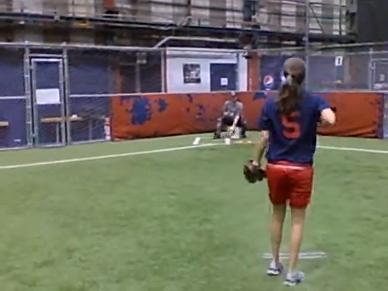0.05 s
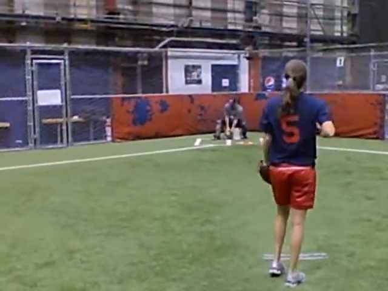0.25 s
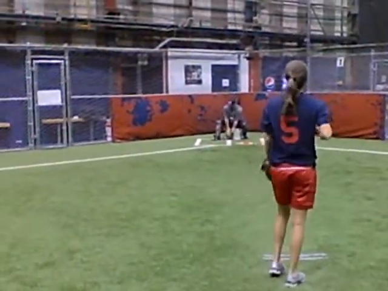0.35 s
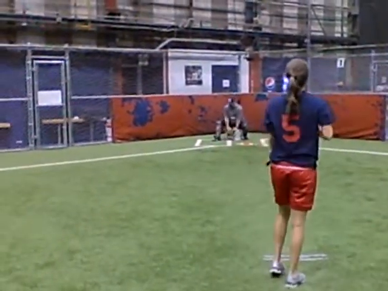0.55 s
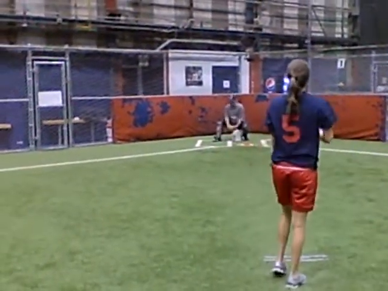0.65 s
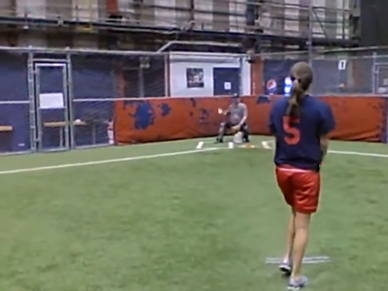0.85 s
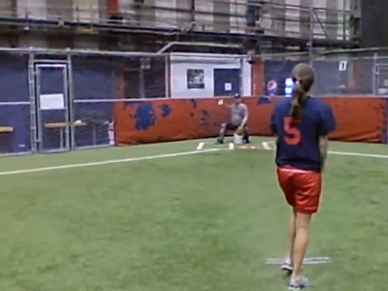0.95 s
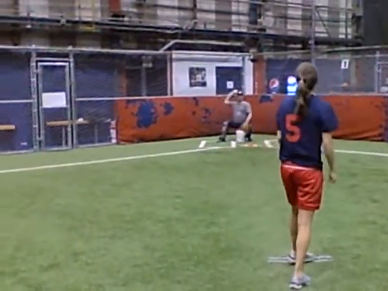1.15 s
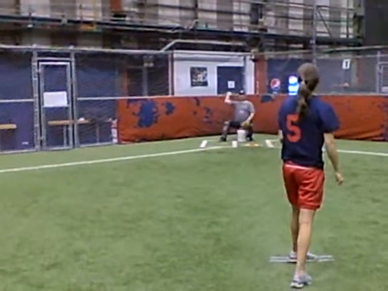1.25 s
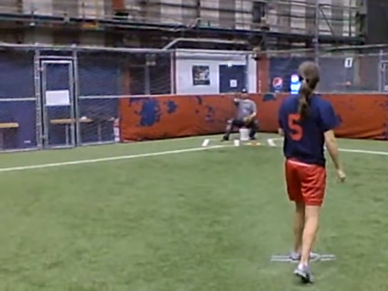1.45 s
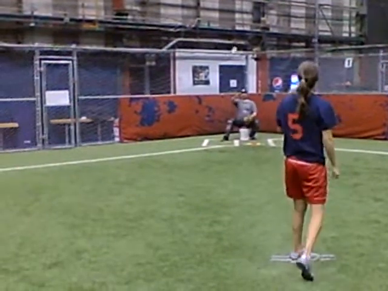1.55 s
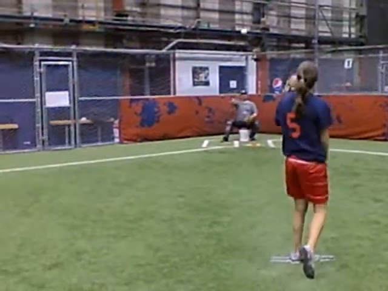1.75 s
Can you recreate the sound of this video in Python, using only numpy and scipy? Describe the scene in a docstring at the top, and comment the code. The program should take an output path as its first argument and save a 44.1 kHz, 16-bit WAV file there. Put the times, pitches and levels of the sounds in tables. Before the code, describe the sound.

A thrown ball smacks once into a leather glove. Quick echoes bounce off the walls of a large indoor practice hall and fade, leaving a faint, steady ventilation rumble.

```python
"""A catch in a practice hall

A thrown ball smacks into a leather glove: the impact excites low modes of the padded pocket and bright
ones of the leather. Near surfaces and far walls reflect the smack, then the large hall reverberates.
Ventilation rumbles throughout, with a few faint steady whines."""
import sys
import numpy as np
from scipy import signal
from scipy.fft import rfft, irfft
from scipy.io import wavfile

SR = 44100
rng = np.random.default_rng(int(sys.argv[2]) if len(sys.argv) > 2 else 0)


def log_audio(samples):
    """Write samples as a 16-bit WAV file to the path given in sys.argv[1]."""
    # one column per channel
    frames = np.atleast_2d(samples).T
    # limit to full scale, then quantise
    limited = np.clip(frames, -1, 1)
    pcm = np.round(limited * 32767).astype(np.int16)
    wavfile.write(sys.argv[1], SR, pcm)


N = 79380
T = np.arange(N) / SR
BIN_HZ = np.fft.rfftfreq(N, 1 / SR)
CATCH_S, CUTOFF_HZ = .2014, 7800


def from_db(db):
    """Amplitude ratio of a level in decibels."""
    return 10 ** (np.asarray(db) / 20)


def unit_rms(x):
    """Normalisation to an rms of 1."""
    return x / np.sqrt(np.mean(x ** 2) + 1e-20)


def at_hz(table, hz, column=1):
    """Interpolation of a table column on a log-frequency axis."""
    rows = np.array(table, float)
    return np.interp(np.log(np.maximum(hz, 1)), np.log(rows[:, 0]), rows[:, column])


def noise(spectrum):
    """Spectral shaping: white noise takes the given colour, at an rms of 1."""
    white = rfft(rng.standard_normal(N))
    return unit_rms(irfft(white * from_db(at_hz(spectrum, BIN_HZ)), N))


def decay(start, t60):
    """Exponential decay: 1 at the start, 60 dB down after t60 seconds."""
    return (T >= start) * np.exp(-np.log(1000) * np.maximum(T - start, 0) / t60)


def swell(start, rise_s):
    """Exponential approach from 0 towards 1."""
    return 1 - np.exp(-np.maximum(T - start, 0) / rise_s)


def ring(start, modes):
    """Modal superposition: damped sines set off together."""
    return sum(from_db(db) * decay(start, t60) * np.sin(2 * np.pi * hz * (T - start))
               for hz, db, t60 in modes)


def band(x, low_hz, high_hz, order=1):
    """Causal band-pass filtering."""
    sos = signal.butter(order, [low_hz, high_hz], "band", fs=SR, output="sos")
    return signal.sosfilt(sos, x + 1e-18)


def ventilation():
    """Broadband air noise, with whines that waver by random amplitude and phase modulation."""
    # rush of air: (frequency [Hz], relative spectral level [dB])
    air_spectrum = [(20, -3), (40, -3.5), (54, -0.5), (74, -10), (115, -4), (190, -9), (240, -1.5),
                    (300, -4), (450, -8.5), (780, -7), (1000, -12.5), (1300, -11), (1900, -24.5),
                    (3600, -26.5), (5400, -28.5), (6400, -27), (7200, -33.5)]
    # steady whines: (frequency [Hz], rms level [dB])
    whines = [(54, -75.5), (1200, -77), (2998, -93), (3601, -82.5), (3720, -87), (4081, -97.5),
              (6239, -92.5)]
    sound = from_db(-60.5) * noise(air_spectrum)
    slow = np.exp(-BIN_HZ / 32)  # the wavering lies mostly below 32 Hz
    for hz, db in whines:
        drift = irfft(rfft(rng.standard_normal((2, N))) * slow, N)
        waver, phase = 0.2 * unit_rms(drift)
        sound += from_db(db) * np.sqrt(2) * (1 + waver) * np.sin(2 * np.pi * hz * T + phase)
    return sound


def glove():
    """Impact excitation: pocket and leather ring in damped modes, and slaps add bursts of noise."""
    # modes of the padded pocket: (frequency [Hz], level [dB], t60 [s])
    pocket_modes = [(212.6, -22.5, 0.05), (288, -16, 0.023), (408.4, -25, 0.037), (692, -31, 0.035),
                    (932, -42, .1), (1372, -35, 0.069), (1490, -39.5, 0.08)]
    # modes of the leather: (frequency [Hz], level [dB], t60 [s])
    leather_modes = [(2023, -35, 0.024), (3110, -32, 0.019), (3340, -23.5, 0.0088), (4034, -25.5, 0.015),
                     (4940, -36, .016), (5086, -32.5, 0.013)]
    # leather slaps the ball as the glove shuts: (time [s], relative level [dB])
    slaps = [(0.2026, 2.5), (0.2021, 4), (0.2043, -4.5)]
    # crack of those slaps: (frequency [Hz], relative spectral level [dB])
    crack_spectrum = [(100, -10.5), (400, -11), (1200, -1), (1750, -12), (2600, 0.5), (4000, -8.5),
                      (5500, 2), (7000, -16.5)]
    pocket = ring(CATCH_S, pocket_modes) * swell(CATCH_S, rise_s=.0013)  # the ball sinks into padding
    thump = band(pocket, 124, CUTOFF_HZ, order=2)  # a glove is too small to radiate deep bass
    leather = ring(CATCH_S, leather_modes) * swell(CATCH_S, rise_s=.0011)
    bursts = sum(from_db(db) * decay(start, t60=.018) for start, db in slaps)
    crack = from_db(-44.5) * noise(crack_spectrum) * bursts
    return thump + leather + crack


def echoes(smack):
    """Specular reflection: each surface returns a delayed, weaker, band-limited copy of the smack."""
    # reflections: (arrival time [s], gain [dB], low edge [Hz], high edge [Hz])
    reflections = [(0.2104, -15, 500, 4500), (.2185, -13, 120, 1820), (0.2725, -24, 1200, 7060),
                   (0.2868, -26.5, 1280, 7470), (0.2959, -13.5, 890, 7560), (.3000, -23, 603, 6500),
                   (0.345, -22, 150, 4000), (.3715, -21.5, 1500, 7000)]
    sound = np.zeros(N)
    for arrival, db, low, high in reflections:
        delayed = np.interp(T - (arrival - CATCH_S), T, smack, left=0)
        sound += from_db(db) * band(delayed, low, high)
    return sound


def sprays():
    """Scattering: fences and roof trusses break the smack into short sprays of noise."""
    # scattered arrivals: (time [s], level [dB], t60 [s])
    arrivals = [(0.211, -43.5, 0.14), (0.2745, -52, 0.037), (0.2857, -44.5, 0.043), (0.2956, -43.5, 0.076),
                (0.346, -50.5, 0.086)]
    # scattered sound: (frequency [Hz], relative spectral level [dB])
    spray_spectrum = [(60, -18.5), (120, -8), (220, -5), (420, -4), (630, -3.5), (930, -2), (1100, -8.5),
                      (1350, 5), (1700, -17), (2200, -6), (2650, -18), (3400, -9), (4600, -19.5),
                      (6500, -20)]
    return noise(spray_spectrum) * sum(from_db(db) * decay(start, t60) for start, db, t60 in arrivals)


def hall():
    """Reverberation: a diffuse field builds up and decays band by band, the bass lasting longest."""
    # diffuse field: (frequency [Hz], relative spectral level [dB], t60 [s])
    field = [(60.5, -13, 2.3), (132, -3, 1.1), (258, 0, 1.57), (390, -1.5, 1.27), (740, 0, 1.26),
             (1330, -4.5, 1.06), (1720, -13.5, 1.34), (2770, -18.5, 1.38), (3600, -12, 0.76),
             (4450, -25, 1), (7000, -29, 1)]
    wash = rfft(noise(field))
    edges_hz = np.geomspace(40, 10240, 17)  # half-octave bands
    tail = np.zeros(N)
    for low, high in zip(edges_hz, edges_hz[1:]):
        band_noise = irfft(wash * ((BIN_HZ >= low) & (BIN_HZ < high)), N)
        t60 = at_hz(field, np.sqrt(low * high), column=2)
        tail += band_noise * decay(CATCH_S, t60)
    return from_db(-43) * swell(start=.22, rise_s=.062) * tail


def wall_panel():
    """Forced vibration: a far panel answers the smack with a hollow knock, a brief tone pulse."""
    start_s, length_s, pitch_hz = .2733, .0086, 660
    age = T - start_s
    pulse = np.sin(np.pi * np.clip(age / length_s, 0, 1))
    return from_db(-35.5) * pulse * np.sin(2 * np.pi * pitch_hz * age)


def bass_bumps():
    """Low-frequency reflection: the bass returns from the far end as soft bumps."""
    # bass returns: (arrival time [s], level [dB])
    bumps = [(0.286, -42.5), (0.345, -53.5)]
    pitch_hz, t60 = 134.3, .1
    return sum(ring(start, [(pitch_hz, db, t60)]) * swell(start, rise_s=.006) for start, db in bumps)


def scene():
    """Superposition of direct sound, early arrivals, reverberation and ventilation in one channel."""
    smack = glove()
    early = echoes(smack) + sprays() + wall_panel() + bass_bumps()
    return (smack + early + hall() + ventilation())[None]


def record(dry):
    """Band limiting: two low-pass filters soften the top treble, then cut it off steeply."""
    roll_off = signal.butter(8, 7100, fs=SR, output="sos")
    steep_cut = signal.cheby2(12, 45, CUTOFF_HZ + 250, fs=SR, output="sos")
    return signal.sosfilt(steep_cut, signal.sosfilt(roll_off, dry))


dry = scene()
out = record(dry)
log_audio(out)
```